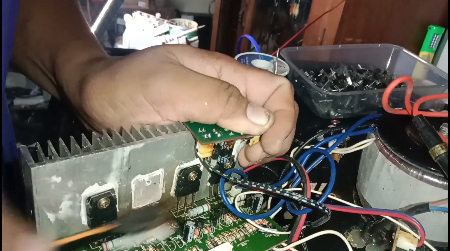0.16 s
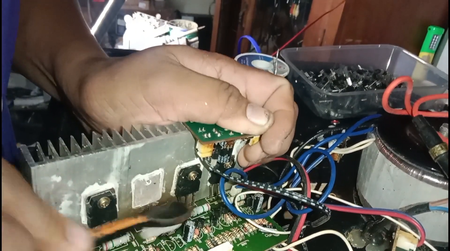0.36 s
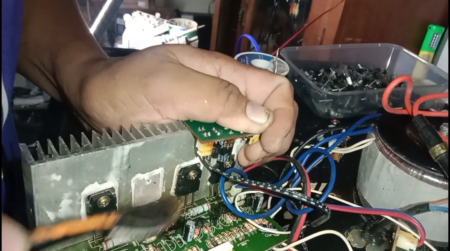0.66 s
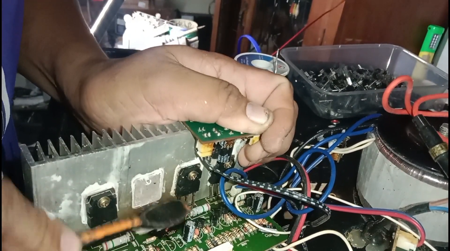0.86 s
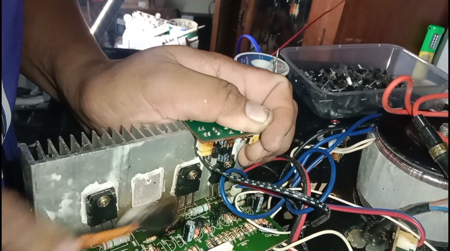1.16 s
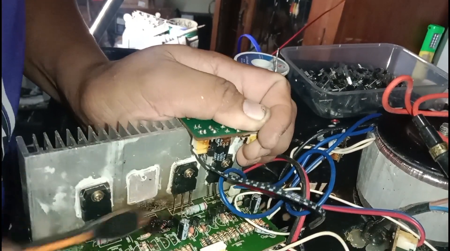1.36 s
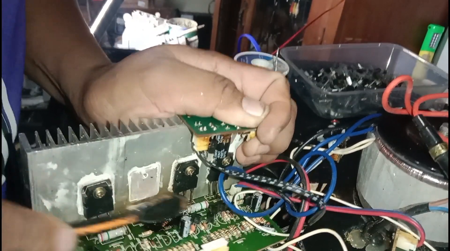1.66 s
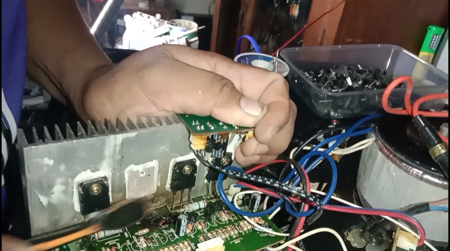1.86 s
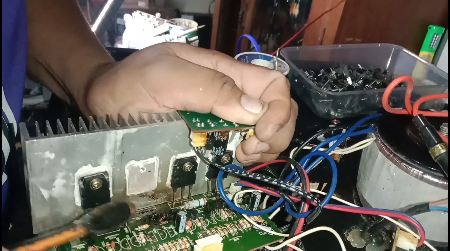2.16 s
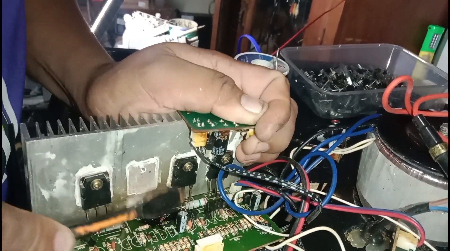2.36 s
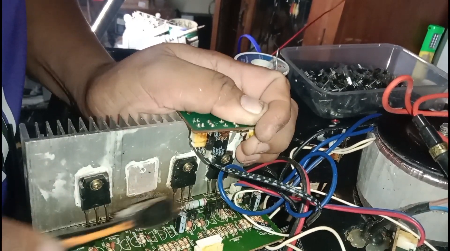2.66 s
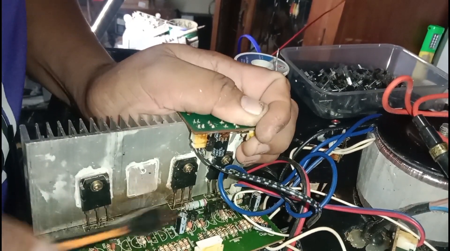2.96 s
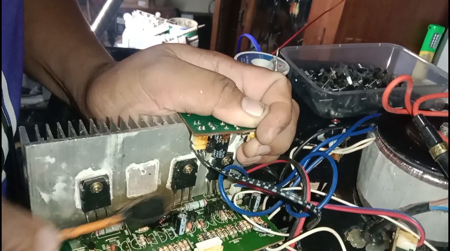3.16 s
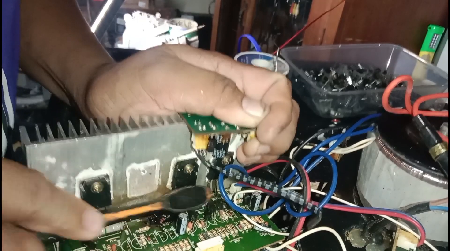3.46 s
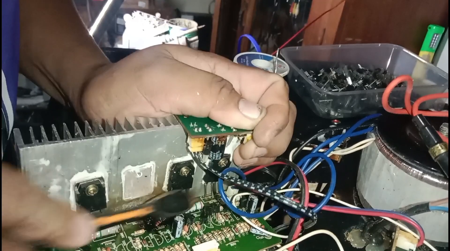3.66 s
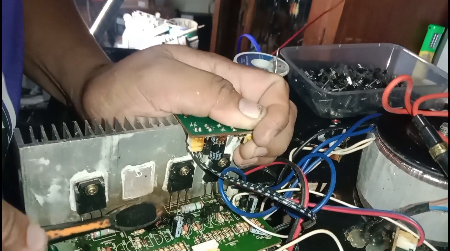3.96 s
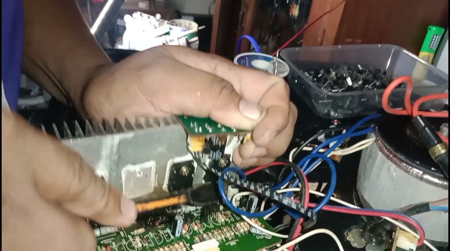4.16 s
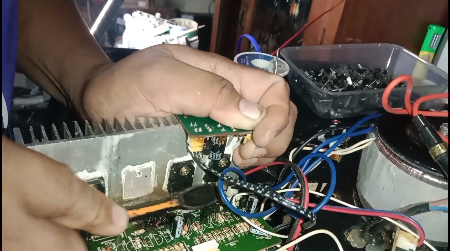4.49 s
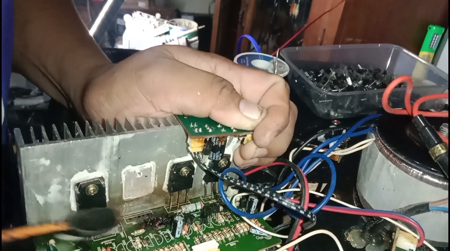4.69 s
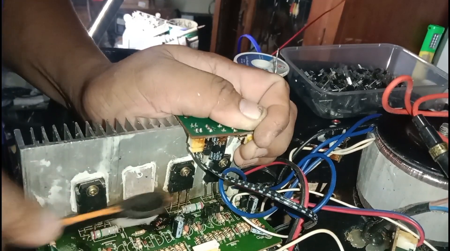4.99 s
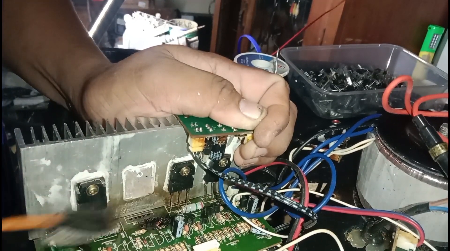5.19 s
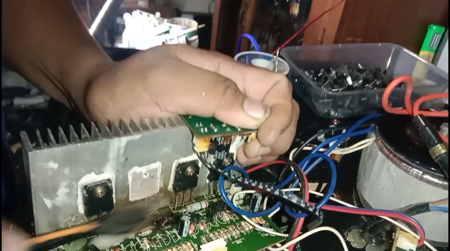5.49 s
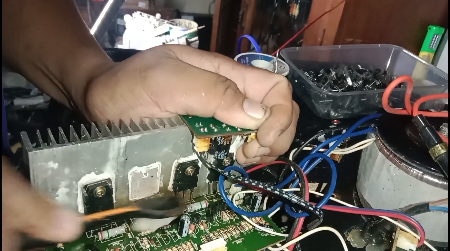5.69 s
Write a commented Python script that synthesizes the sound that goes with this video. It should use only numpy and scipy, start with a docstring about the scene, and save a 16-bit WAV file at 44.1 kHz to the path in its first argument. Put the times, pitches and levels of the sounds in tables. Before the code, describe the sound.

A close, dry-sounding scrub of stiff bristles on a circuit board in a small quiet workshop. From 0 to 0.7 s several quick bright scrapes come close together, with low chassis thuds at 0.16 and 0.52. Strokes then become sparser, with a pause around 0.8-1.0 and short rasps near 1.1, 1.5, 1.9 and 2.2. Meanwhile dull, distant hammer-like knocks repeat about every 0.4 s until about 2.5 s. Hard plastic clicks stand out at 2.07, 2.5 and 2.9, the last with a thud, and again at 3.26. Scraping is lighter around 3 s, then firmer from 3.6 to 4.8, with the heaviest bump at 4.2 and faint ringing from board and metal fins. After a lull near 4.9-5.1 there is a click, a stroke at 5.2, another gap, and a final scrape at 5.65-5.8 with a thin metallic squeal. Soft room tone lies underneath.

```python
"""Scrubbing a circuit board

A stiff toothbrush, held by hand, scrubs an amplifier's circuit board in a small workshop.
Bristles flick at random over solder joints and set the board and the fins of its heat sink ringing.
The brush head clicks against parts as decaying bursts, and bumps make the chassis thud and rumble.
Farther off something knocks steadily, like a hammer: dull noise bursts over a quiet room tone."""
import sys
import numpy as np
from scipy import signal
from scipy.fft import rfft, irfft, next_fast_len
from scipy.io import wavfile

SR = 44100
rng = np.random.default_rng(int(sys.argv[2]) if len(sys.argv) > 2 else 0)


def log_audio(samples):
    """Write samples as a 16-bit WAV file to the path given in sys.argv[1]."""
    # one column per channel
    frames = np.atleast_2d(samples).T
    # limit to full scale, then quantise
    limited = np.clip(frames, -1, 1)
    pcm = np.round(limited * 32767).astype(np.int16)
    wavfile.write(sys.argv[1], SR, pcm)


N = 257103
TIME = np.arange(N) / SR


def from_db(db):
    """Decibels to gain."""
    return 10 ** (np.asarray(db) / 20)


def rms_one(x):
    """Scale to unit power."""
    return x / np.sqrt(np.mean(x ** 2) + 1e-20)


def noise():
    """White noise of unit power, as long as the scene."""
    return rng.standard_normal(N)


def level_curve(rows):
    """Gain of a drawn level curve, straight in dB between its points."""
    seconds, db = np.transpose(rows)
    return from_db(np.interp(TIME, seconds, db))


def drift(rate):
    """Smooth chance with spread 1, heading for a new random value `rate` times a second."""
    return rms_one(np.interp(TIME * rate, np.arange(N), noise()))


def colour(x, spectrum, size=8192):
    """Causal (minimum-phase) filter with the given spectrum; white noise keeps its power."""
    hz, db = np.transpose(spectrum)
    bin_hz = np.arange(size // 2 + 1) * SR / size
    gain = rms_one(from_db(np.interp(np.log(bin_hz + 1), np.log(hz), db)))
    # folding the cepstrum onto positive times gives minimum phase
    cepstrum = irfft(np.log(gain))
    cepstrum[1:size // 2] *= 2
    cepstrum[size // 2 + 1:] = 0
    impulse = irfft(np.exp(rfft(cepstrum)))
    return signal.oaconvolve(x, impulse)[:N]


def resonate(x, hz, width_hz):
    """One two-pole resonance with gain 1 on top."""
    radius = np.exp(-np.pi * width_hz / SR)
    zeros = np.array([1, 0, -1]) * (1 - radius ** 2) / 2
    poles = [1, -2 * radius * np.cos(2 * np.pi * hz / SR), radius ** 2]
    return signal.lfilter(zeros, poles, x + 1e-18)


def body(x, modes):
    """Resonances side by side; white noise keeps about its power."""
    power = sum(from_db(db) ** 2 * np.pi * width / SR for hz, width, db in modes)
    ring = sum(from_db(db) * resonate(x, hz, width) for hz, width, db in modes)
    return ring / np.sqrt(power)


def blow(s, t60, rise_s):
    """Envelope of a blow at time s: a rise against a steady decay of 60 dB per t60."""
    age = np.maximum(TIME - s, 0)
    return (1 - np.exp(-age / rise_s)) * from_db(np.maximum(-60 * age / t60, -200))


# Spectrum of the quiet room. Each row: frequency in Hz, relative density in dB.
AMBIENCE_SPECTRUM = [(25, -9), (70, 16.5), (130, 2.5), (250, 6), (600, -13.5), (1300, -21), (3000, -29.5),
                     (7000, -22.5), (15000, -45)]


def room_tone(level_db):
    """The quiet room: steady noise, strongest in the bass."""
    return from_db(level_db) * colour(noise(), AMBIENCE_SPECTRUM)


# Far blows. Each row: start in seconds, level in dB.
KNOCKS = [(-0.008, -29.5), (0.327, -28), (0.734, -30.5), (1.148, -35.5), (1.596, -31.5), (2.006, -31),
          (2.411, -40.5), (2.501, -32)]
# Spectrum of the dull burst. Each row: frequency in Hz, relative density in dB.
KNOCK_SPECTRUM = [(200, -58.5), (380, -12), (520, 6.5), (680, -1), (900, 3.5), (1150, 9.5), (1450, 2.5),
                  (1800, 2), (2200, -5), (3200, -5.5), (6000, -12), (12000, -48)]
# What the far blows ring with. Each row: frequency in Hz, width in Hz, relative level in dB.
KNOCK_MODES = [(547, 32, 1), (804, 99, -16.5), (1110, 210, -5.5), (1407, 69, -1)]


def far_knocks(tail_db, ring_db):
    """Distance smears each blow into a dull, ringing burst with a reverberant tail."""
    level = 0
    for s, db in KNOCKS:
        burst = blow(s, t60=0.23, rise_s=0.026)
        tail = from_db(tail_db) * blow(s, t60=0.3, rise_s=0.052)
        level = level + from_db(db) * (burst + tail)
    ring = body(level * noise(), KNOCK_MODES)
    return colour(level * noise(), KNOCK_SPECTRUM) + from_db(ring_db) * ring


# Chassis bumping on the bench. Each row: start in seconds, level in dB, pitch in Hz.
BUMPS = [(0.159, -17, 153), (0.518, -13, 137), (0.555, -24, 149), (1.675, -24.5, 318), (1.718, -21, 157),
         (2.067, -18, 131), (2.539, -28, 155), (2.924, -15.5, 134), (3.271, -19, 138), (3.589, -25, 133),
         (4.04, -26, 167), (4.205, -10.5, 159), (4.28, -17.5, 149), (4.406, -18.5, 141),
         (4.755, -16.5, 143), (5.073, -25.5, 159), (5.494, -24.5, 153), (5.551, -29.5, 191)]
# Spectrum of the chassis rumble. Each row: frequency in Hz, relative density in dB.
RUMBLE_SPECTRUM = [(25, -31.5), (55, -18), (90, -8), (130, 2), (170, -2.5), (215, -6.5), (290, -19),
                   (400, -13.5), (700, -28), (2000, -27)]
# The chassis swaying on the bench. Each row: time in seconds, level in dB.
SWAY_CURVE = [(0.0, -62), (0.7, -68), (1.2, -58.5), (1.7, -68), (1.9, -92), (2.74, -86), (3.0, -59),
              (4.2, -60), (4.8, -67.5), (5.24, -57), (5.42, -84), (5.7, -62)]
RUMBLE_LAG_S = 0.011   # the heavy chassis answers late


def chassis(shake, rattle_db, sway_hz, sway_width_hz):
    """The heavy chassis rumbles just after each stroke, sways, and thuds and rattles when pushed."""
    thuds = 0
    shake = np.interp(TIME - RUMBLE_LAG_S, TIME, shake)
    for s, db, hz in BUMPS:
        envelope = from_db(db) * blow(s, t60=0.059, rise_s=0.018)
        thuds = thuds + envelope * np.sin(2 * np.pi * hz * (TIME - s))
        rattle = from_db(db + rattle_db) * blow(s, t60=0.26, rise_s=0.0068)
        shake = np.hypot(shake, rattle)
    rumble = colour(shake * noise(), RUMBLE_SPECTRUM)
    # two passes through one resonance narrow the noise to a wavering hum
    sway = resonate(noise(), sway_hz, sway_width_hz)
    sway = rms_one(resonate(sway, sway_hz, sway_width_hz))
    return thuds + rumble + level_curve(SWAY_CURVE) * sway


# Circuit board resonances. Each row: frequency in Hz, width in Hz, relative level in dB.
BOARD_MODES = [(400, 40, -32), (539, 14, -5.5), (770, 120, -9), (1210, 79, 5.5), (1338, 103, 10),
               (1600, 37, -25), (1890, 170, -11), (2325, 59, 3.5)]
# Cushioning bristles landing on the board. Each row: start in seconds, level in dB.
TAPS = [(0.257, -30.5), (3.952, -34), (4.209, -27.5), (5.044, -46), (5.474, -40.5), (5.552, -41)]
TAP_HZ, TAP_T60_S = 1282, 0.05


def soft_taps(rustle_db):
    """A soft landing rings only the board: mostly one decaying mode, plus a rustle."""
    ring, hits = 0, 0
    for s, db in TAPS:
        hit = from_db(db) * blow(s, TAP_T60_S, rise_s=0.00105)
        ring = ring + hit * np.sin(2 * np.pi * TAP_HZ * (TIME - s))
        hits = hits + hit
    return ring + from_db(rustle_db) * body(hits * noise(), BOARD_MODES)


# Brush head clicking on parts. Each row: start in seconds, level in dB, treble relative in dB,
# weight on the board relative in dB, 60 dB decay time in seconds.
CLICKS = [(0.519, -35, 10, 3, 0.025), (0.979, -40, -13, -17, 0.085), (1.095, -38, -10, -15, .05),
          (1.512, -38.5, -2, -12, .04), (1.878, -43, -8, -1, 0.041), (2.065, -23, -16, -3.5, .022),
          (2.518, -26, -20, 5.5, 0.019), (2.905, -28.5, -12, -10, 0.034), (2.910, -19, -12.5, 1, 0.027),
          (3.085, -31.5, -5, 1, 0.018), (3.232, -44, -8, -2, 0.045), (3.257, -24.5, -26, -1, 0.022),
          (3.314, -35, -18, -1, 0.016), (3.771, -40.5, 18, 3, 0.01), (4.212, -38, 13, -3, 0.024),
          (4.392, -29.5, -8, 9, 0.019), (4.573, -33.5, 7, 5, .014), (4.724, -33, 11.5, -12, 0.025),
          (5.086, -26, -15, -11.5, .024), (5.481, -33, -2, -5.5, 0.012)]
# Spectrum of a click's middle. Each row: frequency in Hz, relative density in dB.
CLICK_SPECTRUM = [(300, -77), (900, -39), (1400, -48.5), (1900, -15.5), (2600, 12.5), (3300, 9),
                  (4000, 5.5), (5200, 12.5), (6500, 2.5), (9000, -2.5), (16000, -45.5)]
# Spectrum of the fine hiss, also a click's treble. Each row: frequency in Hz, relative density in dB.
HISS_SPECTRUM = [(3000, -51), (7000, -8), (9500, -3), (11300, -0.5), (12700, 1.5), (14000, 0), (15300, 5),
                 (16000, -17.5)]
PART_LOW_HZ, PART_LOW_DB = 2442, -2     # a struck part's low mode, raised by a heavy click
PART_HIGH_HZ, PART_HIGH_DB = 5330, -9   # and its high mode


def head_clicks(shake_db):
    """Hard plastic chatters briefly on a part, rings its two modes and shakes the board."""
    middle, treble, board, parts = np.zeros((4, N))
    for s, db, treble_db, weight_db, t60 in CLICKS:
        hit = from_db(db) * blow(s, t60, rise_s=0.00015)
        middle += hit
        treble += hit * from_db(treble_db)
        board += hit * from_db(weight_db + shake_db)
        turn = 2 * np.pi * (TIME - s)
        parts += hit * from_db(weight_db + PART_LOW_DB) * np.sin(PART_LOW_HZ * turn)
        parts += hit * from_db(PART_HIGH_DB) * np.sin(PART_HIGH_HZ * turn)
    chatter = rng.choice([-1, 1], N)
    click = colour(middle * chatter, CLICK_SPECTRUM) + colour(treble * chatter, HISS_SPECTRUM)
    return click + body(board * chatter, BOARD_MODES) + parts


# A metal edge singing as the brush drags along it. Each row: time in seconds, level in dB.
SING_CURVE = [(5.64, -83), (5.675, -38), (5.705, -30), (5.73, -28.5), (5.755, -32.5), (5.79, -37.5),
              (5.83, -38)]
# Partials of that edge. Each row: frequency in Hz, relative level in dB.
SING_PARTIALS = [(2950, -8.5), (4441, 0), (4560, -2.5), (4974, -6.5), (5259, -10), (6481, 2.5), (6896, -15),
                 (7736, -8), (9044, -7.5), (15283, -9)]


def singing_edge(width_hz):
    """Friction keeps a few narrow metal modes going, with wavering phase and level."""
    tone = 0
    for hz, db in SING_PARTIALS:
        wander = np.cumsum(noise()) * np.sqrt(2 * np.pi * width_hz / SR)
        partial = np.sin(2 * np.pi * hz * TIME + wander)
        tone = tone + from_db(db + 2.1 * drift(70)) * partial
    return level_curve(SING_CURVE) * rms_one(tone) * (TIME > SING_CURVE[0][0])


# Pressed tufts that ring hollow. Each row: start in seconds, end in seconds, starting pitch in Hz,
# level in dB.
GLIDES = [(2.228, 2.383, 1400, -46), (3.042, 3.18, 1330, -50.5), (3.279, 3.376, 800, -51.5),
          (3.56, 3.683, 900, -48), (3.81, 3.956, 1040, -49.5), (4.093, 4.187, 1000, -52),
          (5.144, 5.296, 1500, -41), (5.182, 5.21, 648, -48), (5.489, 5.559, 1095, -52),
          (5.697, 5.815, 940, -59)]
GLIDE_SAG = 0.2   # share of its pitch that a tuft loses as it bends


def tuft_glides(width_hz):
    """Friction noise in one narrow resonance that sinks in pitch as the bristles bend."""
    out = np.zeros(N)
    lowpass = signal.butter(2, width_hz / 2, fs=SR, output="sos")
    slow = signal.sosfilt(lowpass, rng.standard_normal((2, N)))
    for start, end, hz, db in GLIDES:
        near = (TIME > start) & (TIME < end)
        progress = (TIME[near] - start) / (end - start)
        phase = 2 * np.pi * np.cumsum(hz * (1 - GLIDE_SAG * progress)) / SR
        # slow noise on two carriers makes a narrow band around the sliding pitch
        ring = rms_one(slow[0, near] * np.cos(phase) + slow[1, near] * np.sin(phase))
        out[near] += from_db(db) * np.sin(np.pi * progress ** 0.61) * ring
    return out


FADE_DB_PER_S = 295   # the bristles straighten after a stroke


def stroke(start, end, db, swell_db_per_s):
    """Gain of one pass of the brush: it swells, holds from start to end, and fades."""
    before_db = swell_db_per_s * np.maximum(start - TIME, 0)
    after_db = FADE_DB_PER_S * np.maximum(TIME - end, 0)
    return from_db(db - np.minimum(before_db + after_db, 120))


# Brush strokes. Each row: start in seconds, end in seconds, scrape level in dB, swell in dB per second,
# fine hiss relative in dB, chassis rumble relative in dB.
STROKES = [(0.0, 0.066, -43.5, 400, 0.5, -18), (0.106, 0.175, -32, 384, -0.5, -17.5),
           (0.293, 0.333, -28, 294, -1.5, -19.5), (0.393, 0.456, -41.5, 399, -2.5, -31),
           (0.485, 0.525, -32, 378.5, -3, -36), (0.627, 0.697, -29.5, 319, -2, -22.5),
           (1.102, 1.173, -34, 803, 0, -17.5), (1.434, 1.485, -44.5, 702.5, -6, -15),
           (1.516, 1.53, -34.5, 1300, 2, -25), (1.881, 1.899, -34.5, 1100, 1.5, -7),
           (2.219, 2.259, -33.5, 449, 0.5, -19), (2.384, 2.446, -44.5, 295, -3.5, -38),
           (2.646, 2.711, -38.5, 300.5, -2.5, -19), (2.923, 3.045, -46, 598, -10, -11.5),
           (3.312, 3.376, -46.5, 503, -3, -9), (3.615, 3.721, -40, 280, 2.5, -12),
           (3.872, 3.892, -35.5, 398, 2, -23), (4.008, 4.065, -32, 599.5, 1, -9.5),
           (4.214, 4.26, -36.5, 1801.5, 4, -14), (4.393, 4.438, -28.5, 597.5, 0.5, -8.5),
           (4.572, 4.597, -35, 1399, 2, -10), (4.732, 4.815, -29.5, 599, 1, -14),
           (5.164, 5.267, -33.5, 900, -2.5, -18.5), (5.623, 5.707, -36.5, 399, 2, -33),
           (5.703, 5.827, -40.5, 403, -2, -38)]
# The brush easing off or leaving the board. Each row: start in seconds, end in seconds,
# greatest loss in dB.
LIFTS = [(0.815, 0.998, 35), (1.008, 1.078, 5), (1.259, 1.423, 33), (1.56, 1.617, 6.5), (1.727, 1.839, 22),
         (1.926, 2.008, 15), (2.081, 2.145, 4.5), (2.3, 2.366, 3.5), (2.495, 2.578, 7), (2.745, 2.892, 7.5),
         (3.098, 3.296, 14), (3.415, 3.54, 22), (4.865, 5.118, 29.5), (5.11, 5.167, 6), (5.265, 5.505, 44),
         (5.509, 5.592, 13)]
LIFT_DB_PER_S, LAND_DB_PER_S = 339, 600
# light contact between strokes: scrape in dB, hiss and rumble relative to it in dB
DRAG_DB, DRAG_HISS_DB, DRAG_RUMBLE_DB = -46.5, -2, -37


def contact():
    """Gains of scrape, hiss and rumble: strokes ride on a light drag; lifts take all three down."""
    drag = from_db(DRAG_DB + np.array([0, DRAG_HISS_DB, DRAG_RUMBLE_DB]))
    power = np.outer(drag ** 2, np.ones(N))
    for start, end, db, swell, hiss_db, rumble_db in STROKES:
        shares = from_db([0, hiss_db, rumble_db])
        power += np.outer(shares, stroke(start, end, db, swell)) ** 2
    away_db = 0
    for start, end, loss_db in LIFTS:
        leaving_db = LIFT_DB_PER_S * (TIME - start)
        landing_db = LAND_DB_PER_S * (end - TIME)
        away_db = away_db + np.clip(np.minimum(leaving_db, landing_db), 0, loss_db)
    return np.sqrt(power) * from_db(-away_db)


FIRM_STROKE_DB = -35


def driven(scrape, db, follows):
    """Gain of something the brush drives: db in a firm stroke, then `follows` dB per dB of scrape."""
    return from_db(db) * (scrape / from_db(FIRM_STROKE_DB)) ** follows


def bristles(speed, flicks_per_s, size_spread_db, tuft_db, tuft_rate, rub):
    """Bristles snap free at random, more often at speed; whole tufts catch and slip together."""
    chance = np.clip(flicks_per_s * speed / SR, 1e-3, 1)
    excess = np.minimum(rng.exponential(1, N), 4)
    sizes = rms_one(from_db(size_spread_db * excess)) * rng.choice([-1, 1], N)
    # rarer flicks are larger, so the expected power stays even
    flicks = sizes * (rng.random(N) < chance) / np.sqrt(chance)
    friction = flicks + rub * noise()
    return rms_one(friction * from_db(tuft_db * drift(tuft_rate)))


def patchy(x, depth_db, rate):
    """Tufts of different stiffness take turns: each band of the friction comes and goes by itself."""
    size = next_fast_len(N)
    spectrum = rfft(x, size)
    hz = np.arange(size // 2 + 1) * SR / size
    centres = np.geomspace(400, 15000, 22)
    out = 0
    for pick in np.eye(len(centres)):
        # triangular bands that overlap and add up to the whole
        band = irfft(spectrum * np.interp(hz, centres, pick), size)[:N]
        out = out + band * from_db(depth_db * drift(rate))
    return rms_one(out)


# Spectrum of the scrape. Each row: frequency in Hz, relative density in dB.
SCRAPE_SPECTRUM = [(200, -37.5), (900, -41), (1500, -23), (2100, -40), (3000, -11), (4200, -10.5),
                   (4800, 1.5), (5600, 4), (6100, 0.5), (7600, -0.5), (9200, -24.5), (11500, -22.5),
                   (16000, -44)]
# Spectrum of the lower rasp. Each row: frequency in Hz, relative density in dB.
RASP_SPECTRUM = [(500, -35.5), (1300, -3.5), (1950, -13.5), (2500, 1), (2900, 1.5), (3300, 4.5),
                 (3800, -1.5), (4500, -14), (7000, -45.5)]


def direct_friction(force, scrape, hiss):
    """Bristle friction heard straight from the brush, as scrape, rasp and fine hiss."""
    rasp = driven(scrape, db=-43.5, follows=0.97)
    out = colour(force * scrape, SCRAPE_SPECTRUM)
    out = out + colour(force * rasp, RASP_SPECTRUM)
    return out + colour(force * hiss, HISS_SPECTRUM)


# Resonances of one corner of the board. Each row: frequency in Hz, width in Hz, relative level in dB.
CORNER_MODES = [(408, 70, -16), (515, 21, -3.5), (1340, 37, -1), (2160, 43, 0.5)]
CORNER_FROM_S, CORNER_UNTIL_S = 3.95, 4.84


def board_ring(force, scrape, flicker_db):
    """Friction rings the board, and for a while one corner; the brush's load bends its pitch."""
    drive = driven(scrape, db=-44.5, follows=0.86) * from_db(flicker_db * drift(90))
    in_corner = (TIME > CORNER_FROM_S) & (TIME < CORNER_UNTIL_S)
    corner_drive = driven(scrape, db=-46.5, follows=0.95) * in_corner
    ring = body(force * drive, BOARD_MODES) + body(force * corner_drive, CORNER_MODES)
    # a wandering time shift makes the pitch waver by a few percent
    return np.interp(TIME + 0.0016 * drift(20), TIME, ring)


# Heat sink fins. Each row: frequency in Hz, relative level in dB.
FINS = [(4720, -10.5), (5150, -36), (5475, 4.5), (5625, -32), (5830, -12), (5900, -19.5), (6543, 3),
        (6690, 12.5), (6870, -10), (7010, -28), (7330, -8), (7800, 11), (7900, 3), (8550, 9), (10750, 9),
        (11470, -23), (12060, -13.5), (12760, 4), (12980, 6), (14840, -5), (15295, -1.5)]
# Bristle tips sweeping over the heat sink. Each row: start in seconds, end in seconds, level in dB.
FIN_SWEEPS = [(0.11, 0.18, -45), (0.73, 0.805, -50), (2.36, 2.45, -42), (2.8, 2.885, -48), (3.1, 3.26, -49),
              (3.61, 3.73, -45), (3.84, 3.88, -39), (4.125, 4.18, -41), (4.333, 4.36, -41.5),
              (4.49, 4.56, -41.5), (4.692, 4.71, -39.5), (4.895, 4.958, -44)]
FIN_T60_S, SWEEP_DB_PER_S = 0.3, 327.5


def fin_ring(force, scrape):
    """The fins ring with the friction, and more when the bristle tips sweep over them."""
    drive = driven(scrape, db=-53, follows=0.8)
    for start, end, db in FIN_SWEEPS:
        drive = np.hypot(drive, stroke(start, end, db, SWEEP_DB_PER_S))
    width_hz = np.log(1000) / np.pi / FIN_T60_S
    return body(force * drive, [(hz, width_hz, db) for hz, db in FINS])


def scrubbing(scrape, hiss, board_flicker_db):
    """One bristle force is heard directly, through the board and through the ringing fins."""
    speed = rms_one(scrape + from_db(DRAG_DB)) ** 0.4
    force = bristles(speed, flicks_per_s=5600, size_spread_db=2.0, tuft_db=1.37, tuft_rate=300, rub=0.32)
    force = patchy(force, depth_db=2.8, rate=45)
    direct = direct_friction(force, scrape, hiss)
    return direct + board_ring(force, scrape, board_flicker_db) + fin_ring(force, scrape)


def workshop(x, wet_db, t60, size=16384):
    """Close reflections off the bench and the clutter: a short, decaying noise response."""
    echoes = rng.standard_normal(size) * blow(0.003, t60, rise_s=0.0016)[:size]
    echoes = echoes / np.sqrt(np.sum(echoes ** 2))
    return x + from_db(wet_db) * signal.oaconvolve(x, echoes)[:N]


def scene():
    """The quiet room, the far knocks and the work at the bench."""
    scrape, hiss, shake = contact()
    background = room_tone(level_db=-80.0) + far_knocks(tail_db=0.0, ring_db=-6.5)
    low = chassis(shake, rattle_db=-21.5, sway_hz=70, sway_width_hz=38)
    hits = soft_taps(rustle_db=-6) + head_clicks(shake_db=-4)
    friction = singing_edge(width_hz=23.9) + tuft_glides(width_hz=200)
    friction = friction + scrubbing(scrape, hiss, board_flicker_db=2.0)
    bench = workshop(hits + friction, wet_db=-10.0, t60=0.11)
    return (background + low + bench)[None]


CUTOFF_HZ = 15650


def record(dry):
    """A steep elliptic low-pass cuts the top."""
    steep = signal.ellip(12, 0.1, 80, CUTOFF_HZ, fs=SR, output="sos")
    return signal.sosfilt(steep, dry)


dry = scene()
out = record(dry)
log_audio(out)
```